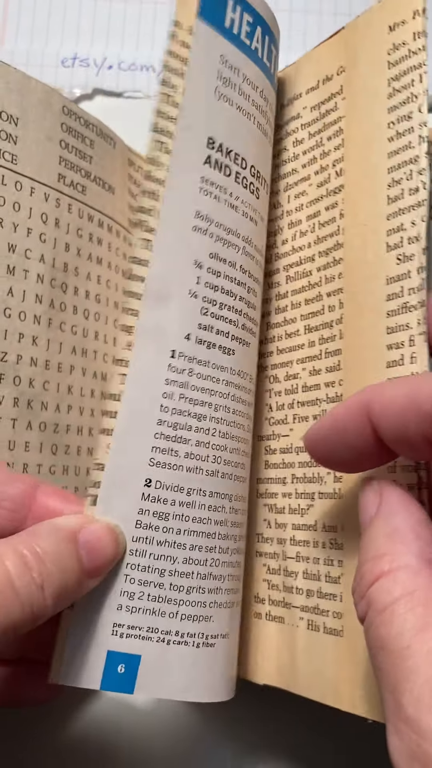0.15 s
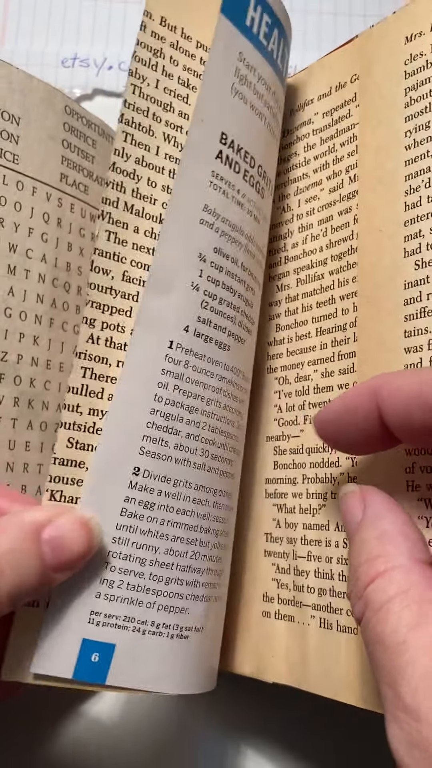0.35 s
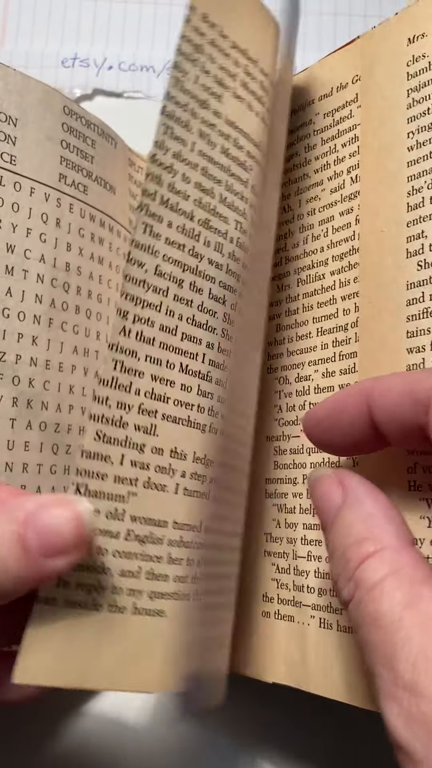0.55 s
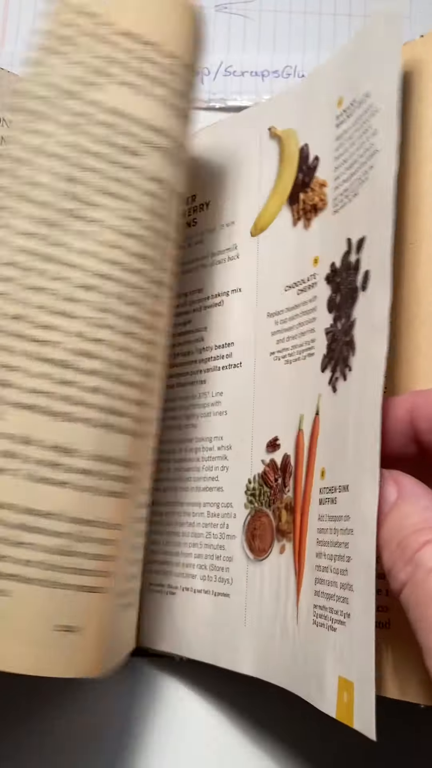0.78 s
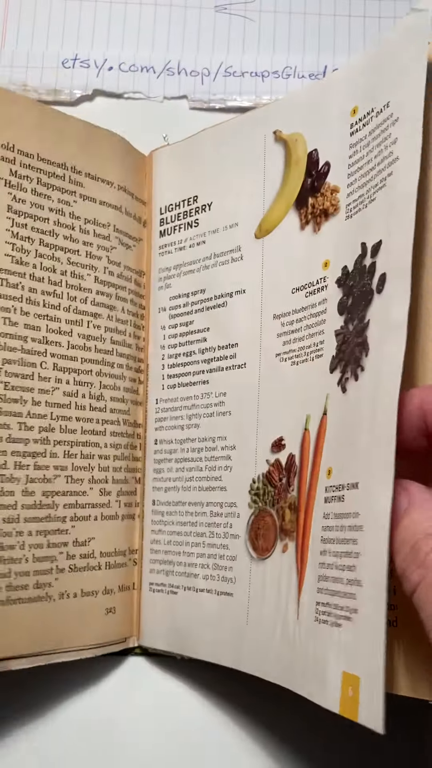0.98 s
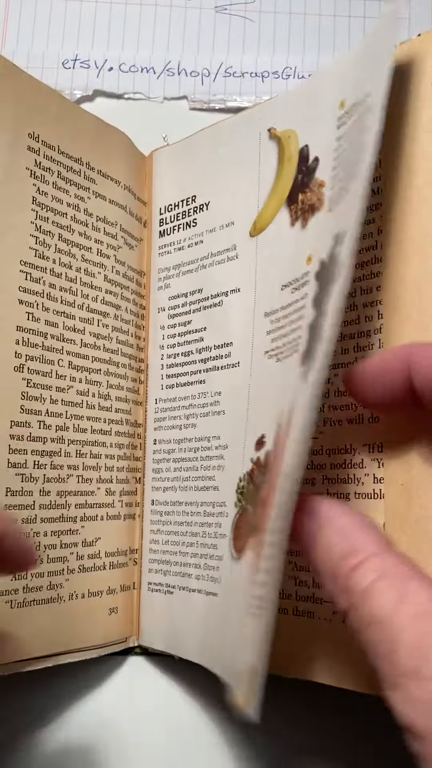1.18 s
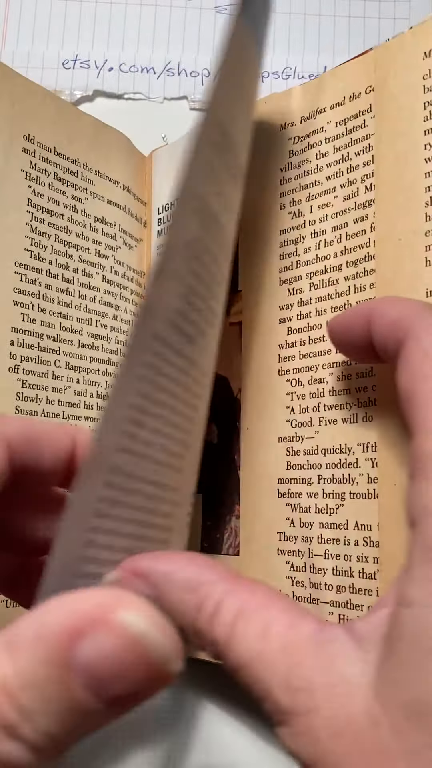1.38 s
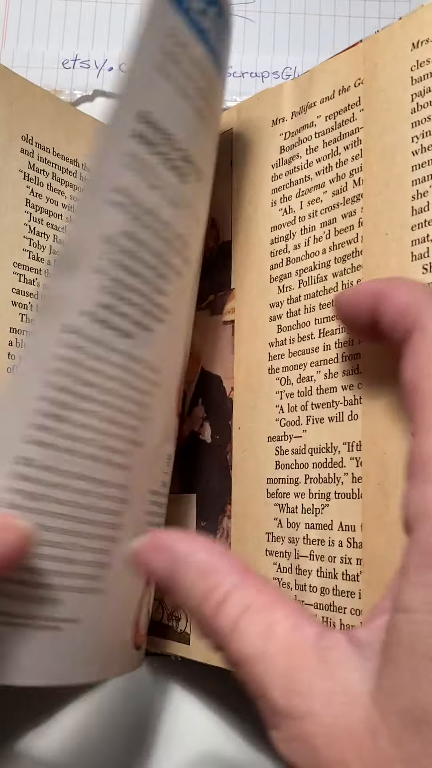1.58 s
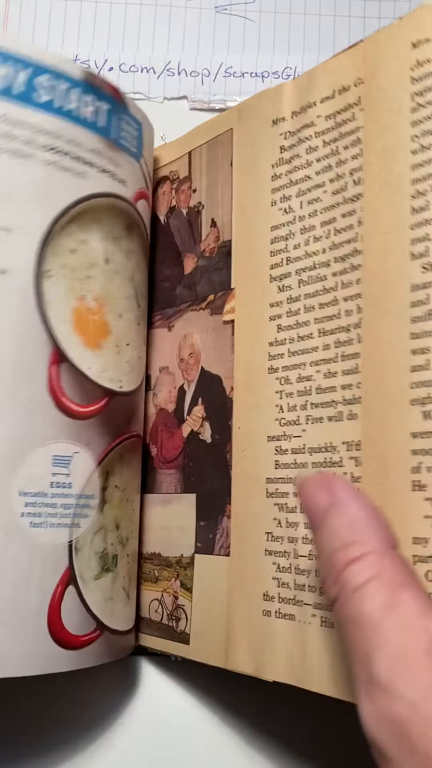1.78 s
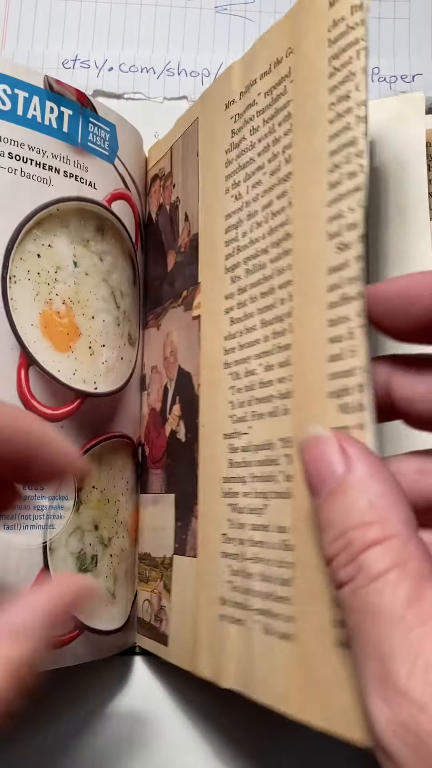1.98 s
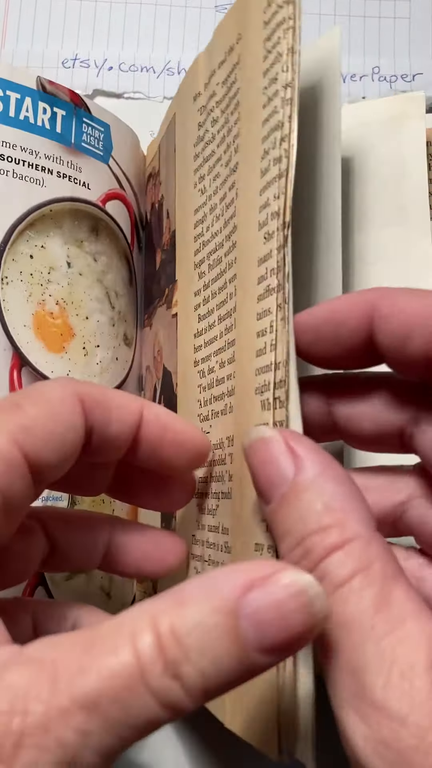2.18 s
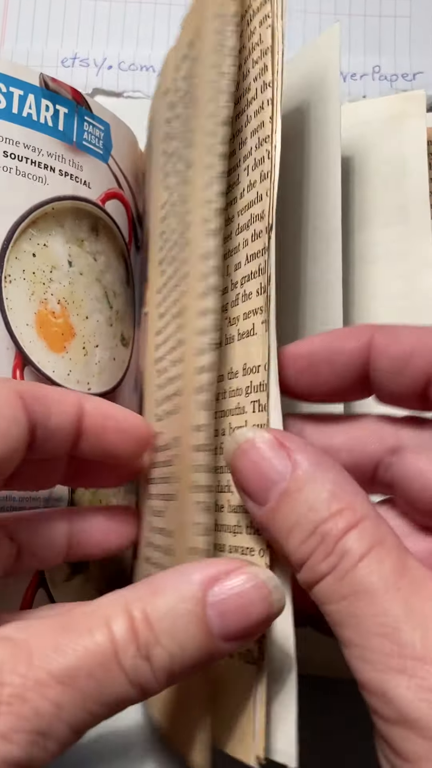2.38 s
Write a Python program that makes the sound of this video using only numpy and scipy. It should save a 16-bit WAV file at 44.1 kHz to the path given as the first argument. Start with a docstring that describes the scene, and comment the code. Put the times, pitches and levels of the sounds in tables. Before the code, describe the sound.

Paper pages turned by hand, with dry rustles, crisp ticks and soft flaps.

```python
"""Scrapbook pages of mixed papers, turned by hand close to a stereo microphone in a small quiet room.
Sheets slide over each other with the grainy hiss of fibres catching and slipping. Their edges tick and
flick free, they buckle with hollow pops, and now and then a page flaps down on the stack and pushes
out a puff of air. Behind them: dull nudges of the book, a short room tail and a faint rumble."""
import sys
import numpy as np
from scipy import signal
from scipy.fft import rfft, irfft
from scipy.io import wavfile
from scipy.ndimage import uniform_filter1d

SR = 44100
rng = np.random.default_rng(int(sys.argv[2]) if len(sys.argv) > 2 else 0)


def generate_wav(sig):
    """Save sig (samples, or channels by samples) to the path in sys.argv[1] as 16-bit PCM at SR."""
    pcm = np.round(np.clip(np.atleast_2d(sig).T, -1, 1) * 32767).astype(np.int16)
    wavfile.write(sys.argv[1], SR, pcm)


N = 110250

# Spectrum of a sheet's body: f/Hz, level/dB
SHEET_BODY = [(60, -47), (250, -15), (450, -17), (850, -10.5), (1300, -3.5), (3500, -5), (5500, -12),
              (12000, -32.5)]


def sliding_sheets(paper):
    """The hand drags sheet over sheet, stroke by stroke."""
    # One table a stroke: t/s, hiss level/dB, body level/dB
    slide_off = [(0.04, -73, -83), (0.15, -72.5, -76), (0.198, -57, -57), (0.216, -32, -44),
                 (0.245, -38, -45.5), (0.281, -42, -60), (0.29, -69, -52.5), (0.341, -66, -66),
                 (0.354, -44.5, -41.5), (0.364, -63, -52.5)]
    swing_over = [(0.47, -80.5, -86.5), (0.565, -58, -59.5), (0.61, -67, -76.5), (0.66, -72, -77.5),
                  (0.78, -68, -82.5)]
    smooth_down = [(0.78, -63, -83), (0.835, -57.5, -62), (0.865, -46, -57.5), (0.9, -55, -61.5),
                   (0.96, -57, -68), (1.02, -60, -68), (1.045, -62.5, -71.5), (1.14, -81.5, -80.5)]
    lift = [(1.14, -72.5, -79), (1.215, -76, -76), (1.29, -50.5, -57), (1.312, -57, -58),
            (1.317, -48.5, -49.5), (1.352, -44, -50.5), (1.365, -69, -57.5), (1.45, -76.5, -82)]
    lay_over = [(1.468, -71, -72), (1.485, -59, -76), (1.55, -52.5, -62.5), (1.578, -58, -59),
                (1.586, -67, -45), (1.61, -52.5, -62), (1.635, -101, -92)]
    settle = [(1.675, -72, -82), (1.692, -57, -61), (1.755, -56.5, -60.5), (1.835, -61, -70.5),
              (1.85, -71, -85), (1.898, -73, -70)]
    thumb_edge = [(1.899, -45, -52), (1.92, -55.5, -54.5), (1.95, -45.5, -54), (1.992, -56, -58),
                  (2.003, -66.5, -71.5), (2.15, -73.5, -106.5)]
    regrip = [(2.2, -83, -90), (2.275, -68.5, -69.5), (2.325, -84, -105), (2.348, -59.5, -91),
              (2.4, -69.5, -95), (2.45, -65.5, -75), (2.5, -65.5, -71)]
    slide(paper, slide_off, sheet_hz=990, sheen_db=9.4)
    slide(paper, swing_over, sheet_hz=810, sheen_db=4.5)
    slide(paper, smooth_down, sheet_hz=1480, sheen_db=0)
    slide(paper, lift, sheet_hz=1940, sheen_db=0)
    slide(paper, lay_over, sheet_hz=1360, sheen_db=-1.4)
    slide(paper, settle, sheet_hz=1410, sheen_db=-0.82)
    slide(paper, thumb_edge, sheet_hz=1920, sheen_db=5.3)
    slide(paper, regrip, sheet_hz=1310, sheen_db=1)


def slide(paper, stroke, sheet_hz, sheen_db):
    """Friction hisses at the contact, with a sibilant sheen, and drives the sheet's resonance."""
    # Spectrum of the contact hiss: f/Hz, level/dB
    contact = [(300, -30), (2000, -16.5), (3500, -8.5), (8300, -2.5), (10500, -5), (15500, -9.5)]
    times, hiss_db, body_db = np.transpose(stroke)
    t = np.arange(times[0], times[-1], 1 / SR)
    hiss = coloured(friction(len(t)), lambda f: read(contact, f) + sheen_db * hump(f, 7750, 0.37))
    body = coloured(friction(len(t)), lambda f: read(SHEET_BODY, f) + 9 * hump(f, sheet_hz, 0.48))
    hiss *= amp(np.interp(t, times, hiss_db))
    body *= amp(np.interp(t, times, body_db))
    add(paper, times[0], hiss + body)


def friction(size):
    """Fibres catch and slip: dense clicks of uneven size over a smooth rub, fluttering in strength."""
    slips_per_s, spread_db, smooth_share, flutter_db = 3000, 2, 0.22, 0.5
    slips = (rng.random(size) < slips_per_s / SR) * rng.choice([-1, 1], size)
    slips = slips * amp(spread_db * np.minimum(rng.exponential(1, size), 4))
    flutter = unit_rms(uniform_filter1d(rng.standard_normal(size), size=200))
    grain = np.sqrt(1 - smooth_share) * unit_rms(slips)
    smooth = np.sqrt(smooth_share) * rng.standard_normal(size)
    return crinkle(grain + smooth) * amp(flutter_db * flutter)


def crinkle(x, depth_db=3.5):
    """The paper's texture is uneven, so each band flares and fades on its own."""
    bands = signal.stft(x, nperseg=128)[2]
    patches = uniform_filter1d(rng.standard_normal(bands.shape), size=4, axis=0)
    patches = unit_rms(uniform_filter1d(patches, size=3, axis=1))
    return unit_rms(signal.istft(bands * amp(depth_db * patches), nperseg=128)[1][:len(x)])


def ticking_edges(paper):
    """Edges tick as they flick free; the tick at 0.3702 s instead prolongs the crack of the page that lands
    just before it."""
    # t/s, level/dB, decay/s
    edge_ticks = [(0.021, -46.5, 0.0028), (0.267, -33, 0.0065), (0.3102, -40, 0.0033),
                  (0.3702, -33, 0.0016), (0.567, -44, 0.0035), (1.0095, -43, 0.0077),
                  (1.109, -49.5, 0.0014), (1.3148, -31.5, 0.0014), (1.321, -23, 0.0012),
                  (1.3315, -34, .0015), (1.3422, -48, 0.0014), (1.3476, -32.5, 0.0013),
                  (1.3885, -36, 0.0012), (1.582, -39, 0.002), (1.8988, -45.5, 0.0048), (2.163, -62.5, 0.02),
                  (2.1995, -36.5, 0.00067)]
    for start, db, decay_s in edge_ticks:
        add(paper, start, snap(db, decay_s))


def snap(db, decay_s, rise_s=0.00082):
    """The dry broadband crack of a paper edge."""
    # f/Hz, level/dB
    crack_spectrum = [(100, -19), (450, -9.5), (850, -3.5), (1400, 3.5), (2400, -4.5), (4000, 0.5),
                      (8000, 2), (11000, -2), (15500, -7.5)]
    t = np.arange(SR // 20) / SR
    return amp(db) * noise(crack_spectrum, len(t)) * np.minimum(t / rise_s, 1) * np.exp(-t / decay_s)


def buckling_sheets(paper, rise_s=0.0011, ring_s=0.006):
    """A sheet flips its curve: a dry crease, a few strong cycles, then a short papery ring."""
    # t/s, level/dB, f/Hz
    buckles = [(0.508, -54, 1022), (0.701, -54, 1150), (0.797, -42, 1374), (0.9155, -45, 1114),
               (1.351, -36, 1760), (1.389, -49, 1310), (1.582, -51.5, 1440), (1.716, -29.5, 1683),
               (1.805, -50, 1710)]
    t = np.arange(SR // 10) / SR
    for start, db, hz in buckles:
        crease = amp(-8.5) * noise(SHEET_BODY, len(t))
        flip = swell(t, rise_s) ** 2 * (np.sin(2 * np.pi * hz * t) + crease)
        ring = coloured(rng.standard_normal(len(t)),
                        lambda f: read(SHEET_BODY, f) + 11 * hump(f, hz, octaves=0.45))
        ring *= amp(-12) * np.minimum(t / rise_s, 1) * np.exp(-t / ring_s)
        add(paper, start, amp(db) * (flip + ring))


def landing_pages(paper):
    """A page slaps the damped stack; the air squeezed out under it flutters and falls in pitch."""
    # t/s, slap level/dB, puff level/dB, puff rise/s, crack level/dB
    landings = [(0.3658, -34, -48.5, 0.0073, -31), (0.5505, -50.5, -66, 0.005, -54),
                (1.0105, -54, -58, 0.0095, -54), (1.606, -52.5, -59, 0.0057, -48.5)]
    # Modes of the stack: f/Hz, level/dB
    stack_modes = [(420, -8), (580, 0), (1140, -0.5), (1440, -6), (1810, -11.5), (3200, -16)]
    from_hz, to_hz, sag_s, flutter_depth = 270, 62, 0.0091, 0.82
    t = np.arange(SR // 8) / SR
    puff_hz = to_hz + (from_hz - to_hz) * np.exp(-t / sag_s)
    air = np.sin(2 * np.pi * np.cumsum(puff_hz) / SR)
    for start, slap_db, puff_db, puff_s, crack_db in landings:
        stack = sum(amp(db) * np.sin(2 * np.pi * (hz * t + rng.random())) for hz, db in stack_modes)
        flutter = 1 + flutter_depth * unit_rms(uniform_filter1d(rng.standard_normal(len(t)), size=120))
        add(paper, start, amp(slap_db) * swell(t, peak_s=0.001) * stack)
        add(paper, start, amp(puff_db) * swell(t, puff_s) * flutter * air)
        add(paper, start + 0.001, snap(crack_db, decay_s=0.0035))


def narrow_bands(paper, half_width_hz=396):
    """Soft narrow bands of noise: two faint rubs and a thin high hiss."""
    # t/s, length/s, level/dB, f/Hz
    soft_bands = [(0.555, 0.14, -64, 1300), (0.66, 0.22, -71.5, 8340), (2.338, 0.068, -64.5, 4210)]
    for start, length_s, db, hz in soft_bands:
        t = np.arange(0, length_s, 1 / SR)
        band = coloured(friction(len(t)), lambda f: -20 * np.log10(1 + ((f - hz) / half_width_hz) ** 2))
        envelope = np.sin(np.pi * np.sqrt(t / length_s)) ** 2
        add(paper, start, amp(db) * envelope * band)


def nudged_book(paper):
    """The bound book answers a buckling or snapping sheet with a dull, hollow knock."""
    # t/s, level/dB
    nudges = [(0.308, -63), (1.389, -64.5), (1.725, -66)]
    t = np.arange(SR // 6) / SR
    for start, db in nudges:
        hollow = coloured(rng.standard_normal(len(t)), lambda f: 60 * hump(f, hz=420, octaves=1.6))
        add(paper, start, amp(db) * hollow * swell(t, peak_s=0.0069))


def close_microphone(x):
    """At close range the sound reaches the microphone's two ports with different delay and strength."""
    # f/Hz, lead of the left port/rad
    port_phase = [(0, 0), (1000, -1.2), (1650, .5), (3300, 1.5), (5400, 3.14), (8000, 5.9), (9000, 6.4),
                  (11700, 9.42), (14500, 12.4), (16500, 12.6)]
    # f/Hz, left minus right level/dB
    port_balance = [(300, -4), (650, 1.5), (1300, -8), (2400, -7), (5000, -2)]
    hz = np.fft.rfftfreq(N, 1 / SR)
    left_gain = amp(read(port_balance, hz))
    right_lag = np.exp(-1j * np.interp(hz, *np.transpose(port_phase)))
    equal_power = np.sqrt(2 / (1 + left_gain ** 2))
    return irfft(rfft(x) * np.array([left_gain, right_lag]) * equal_power, N)


def small_room(x):
    """Quick reflections from desk and hands, then the short tail of the room."""
    # f/Hz, time to fall by 60 dB/s
    reverb_times = [(100, 0.15), (1500, 0.14), (9000, 0.088)]
    tail_db, desk_db, desk_s = -11, -12.5, 0.002
    size = SR // 3
    t = np.arange(size) / SR
    hz, times, bands = signal.stft(rng.standard_normal((2, size)), SR, nperseg=256)
    bands *= amp(-60 * times / read(reverb_times, hz)[:, None])
    tail = signal.istft(bands, SR, nperseg=256)[1][:, :size] * np.minimum(t / 0.0018, 1)
    desk = rng.standard_normal((2, size)) * np.exp(-t / desk_s) * np.minimum(t / 0.00011, 1)
    echo = amp(tail_db) * tail / np.linalg.norm(tail[0]) + amp(desk_db) * desk / np.linalg.norm(desk[0])
    return signal.fftconvolve(x[None], echo, axes=1)[:, :N]


def room_tone(level_db=-73.5, coherence=0.13):
    """Low rumble and faint hiss of the room, mostly different in the two channels."""
    # f/Hz, level/dB
    tone_spectrum = [(20, -14), (75, 2.5), (130, -8.5), (250, -14), (700, -28.5), (8000, -30.5),
                     (16000, -30.5)]
    shared = np.sqrt(coherence) * noise(tone_spectrum, N)
    separate = np.sqrt(1 - coherence) * np.array([noise(tone_spectrum, N) for _ in range(2)])
    return amp(level_db) * (shared + separate)


def amp(db):
    """Decibels to gain."""
    return 10 ** (np.asarray(db) / 20)


def unit_rms(x):
    """Scales to an rms of 1."""
    return x / np.sqrt(np.mean(x ** 2) + 1e-20)


def read(points, hz):
    """Reads a table on a log-frequency axis."""
    f, value = np.transpose(points)
    return np.interp(np.log(hz + 1), np.log(f + 1), value)


def add(mix, start_s, sound):
    """Mixes a sound in at a time."""
    part = mix[max(round(start_s * SR), 0):][:len(sound)]
    part += sound[:len(part)]


def coloured(x, db_at):
    """Filters x by a function from Hz to dB; rms 1."""
    return unit_rms(irfft(rfft(x) * amp(db_at(np.fft.rfftfreq(len(x), 1 / SR))), len(x)))


def noise(spectrum, size):
    """Noise with a given spectrum."""
    return coloured(rng.standard_normal(size), lambda f: read(spectrum, f))


def hump(f, hz, octaves):
    """A bell of height 1 around hz."""
    return np.exp(-.5 * (np.log2((f + 1) / hz) / octaves) ** 2)


def swell(t, peak_s):
    """Rises to 1 at peak_s and dies away."""
    return t / peak_s * np.exp(1 - t / peak_s)


def scene():
    """The scrapbook heard close up and off the walls, over room tone."""
    paper = np.zeros(N)
    sliding_sheets(paper)
    ticking_edges(paper)
    buckling_sheets(paper)
    nudged_book(paper)
    narrow_bands(paper)
    landing_pages(paper)
    return close_microphone(paper) + small_room(paper) + room_tone()


def record(dry, edge_hz=16100):
    """The recorder's band limit."""
    low_pass = signal.firwin(511, edge_hz, window=("kaiser", 9), fs=SR)
    return signal.oaconvolve(dry, low_pass[None], "same")


dry = scene()
out = record(dry)
generate_wav(out)
```